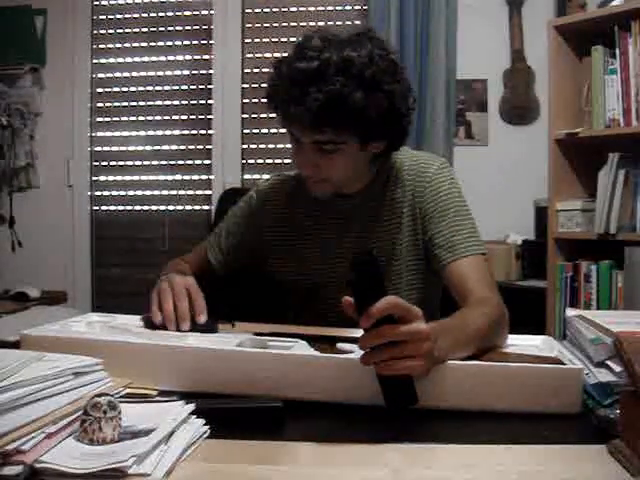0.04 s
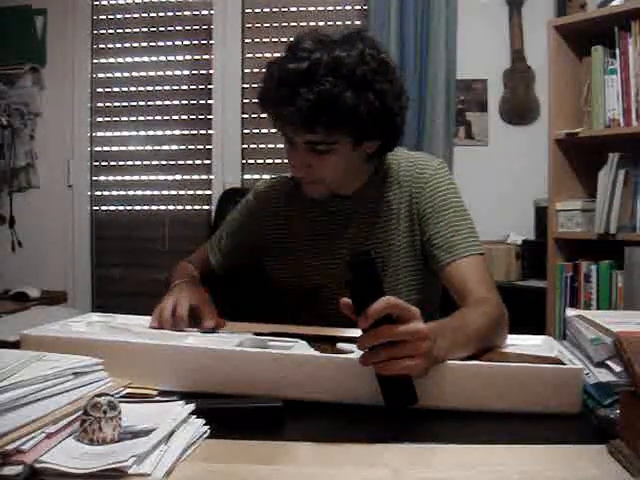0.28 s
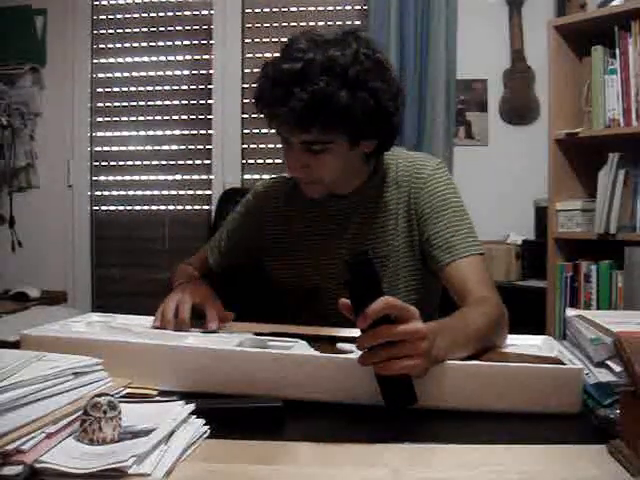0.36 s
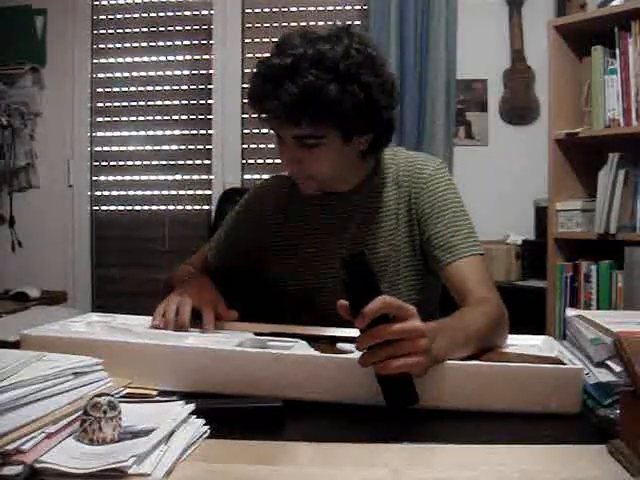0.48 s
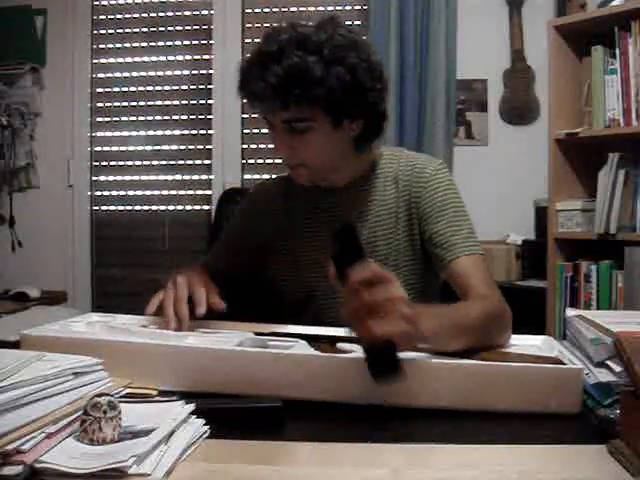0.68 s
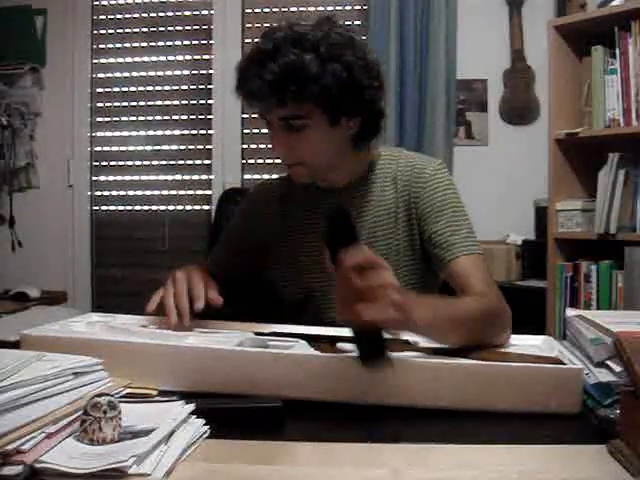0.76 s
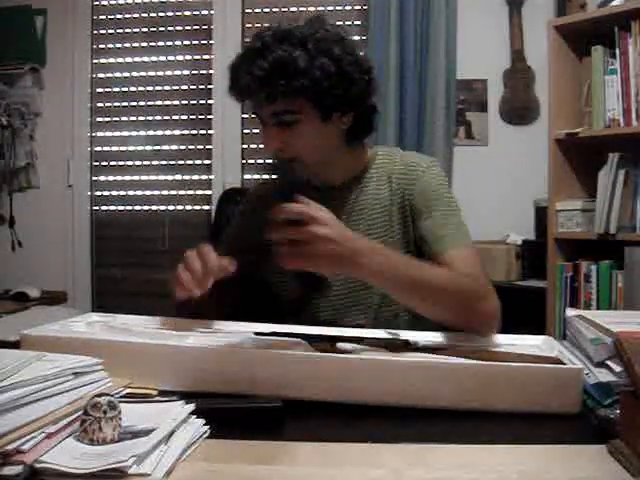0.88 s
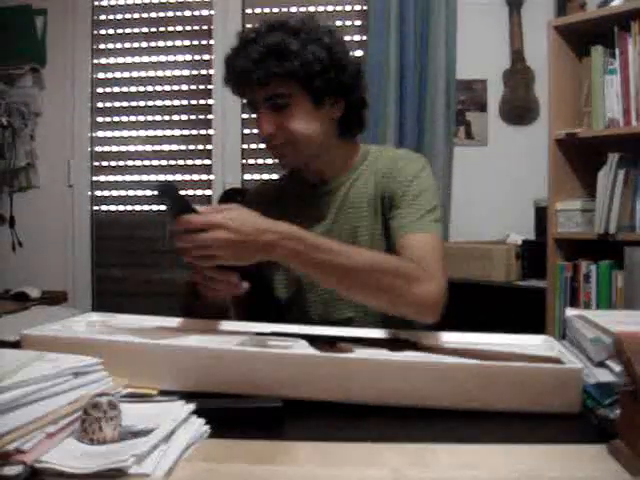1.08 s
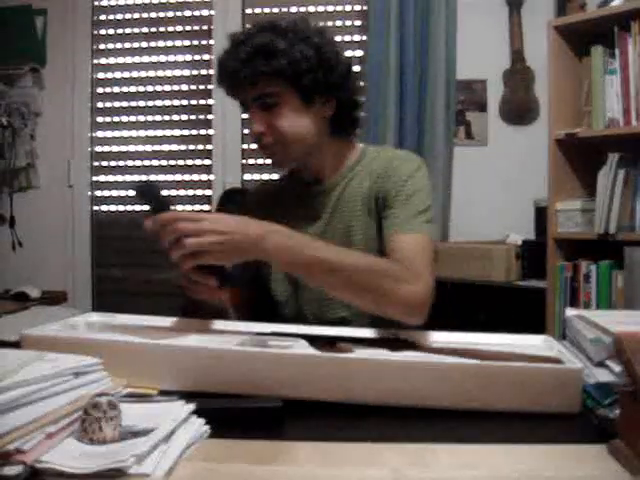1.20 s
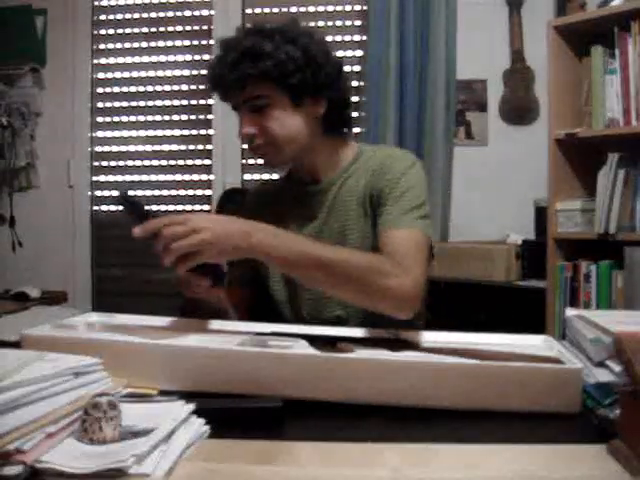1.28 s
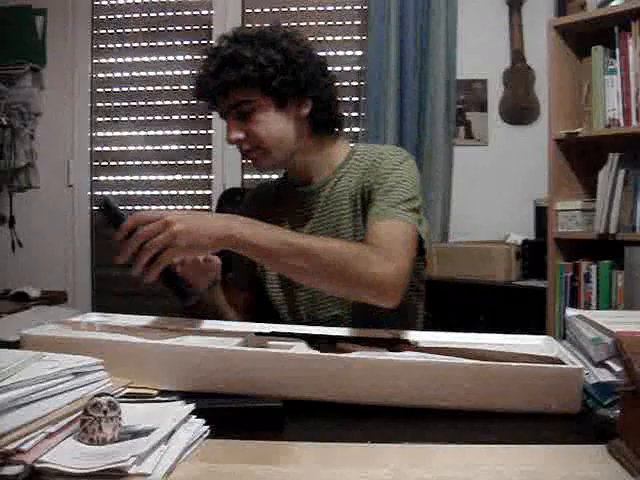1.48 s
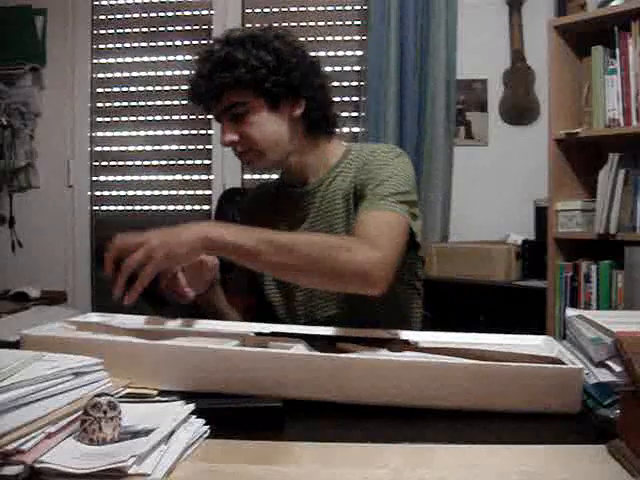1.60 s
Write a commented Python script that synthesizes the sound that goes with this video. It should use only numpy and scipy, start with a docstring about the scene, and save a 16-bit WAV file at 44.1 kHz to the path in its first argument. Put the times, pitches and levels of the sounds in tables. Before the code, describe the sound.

Two hollow knocks of plastic in a cardboard box, amid scraping and small handling clicks.

```python
"""A hard plastic part knocks twice on a cardboard box, scraping as it is let down into it.
Each blow thumps the desk, rings the box, rattles the parts and leans on a small microphone's limiter.
Fingers brush and tick over the parts, then a plastic magazine is picked up with a dry click.
The scrapes are showers of tiny slips; behind it all sit the air of a small room and a brief low hum."""
import sys
import numpy as np
from scipy import signal
from scipy.fft import rfft, irfft, next_fast_len
from scipy.io import wavfile
from scipy.ndimage import uniform_filter1d, minimum_filter1d

SR = 44100
rng = np.random.default_rng(int(sys.argv[2]) if len(sys.argv) > 2 else 0)


def wav_record(signal):
    """Record a signal, one row per channel, as 16-bit PCM in the file named by sys.argv[1]."""
    frames = np.transpose(np.atleast_2d(signal))
    bounded = np.clip(frames, -1, 1)
    # unit amplitude maps onto the largest positive 16-bit level
    quanta = np.round(bounded * 32767).astype(np.int16)
    wavfile.write(sys.argv[1], SR, quanta)


N = 72765
T = np.arange(N) / SR
SIZE = 2 * next_fast_len(N)
HZ = np.fft.rfftfreq(SIZE, 1 / SR)

# The small room's tail. Each row: frequency in Hz, seconds to fall 60 dB.
ROOM_DECAY = [(50, 0.1), (250, 0.27), (700, 0.3), (1400, 0.24), (2200, 0.27), (3500, 0.26), (7000, 0.25),
              (15000, 0.17)]
# Colour of the room tone. Each row: frequency in Hz, relative level in dB.
AIR_COLOUR = [(25, -46), (60, -10), (110, -8.5), (250, -2.5), (400, -0.5), (500, -1), (660, 0.5),
              (760, -5.5), (950, -5.5), (1800, -13), (4000, -15), (7800, -20), (9500, -24.5),
              (10500, -33.5), (15800, -32)]
# Swell of the low hum. Each row: time in seconds, level in dB.
HUM_FADER = [(0.8, -97), (1.0, -61), (1.14, -61.5), (1.27, -57.5), (1.4, -61), (1.52, -75)]
# Swell of the plastic's squeak. Each row: time in seconds, level in dB.
SQUEAK_FADER = [(0.17, -68), (0.187, -32), (0.2, -36), (0.235, -39), (0.26, -80)]
# Plastic and fingers sliding on cardboard. Each row: start, rise, hold and release in seconds,
# level in dB, resonance in Hz, resonance level in dB.
STROKES = [(-0.02, 0.0086, 0.0096, 0.065, -38, 710, -76), (0.045, 0.046, 0.044, .05, -47.5, 836, -54),
           (0.138, 0.068, 0.0087, 0.053, -28, 1240, -37.5), (0.345, 0.023, 0.014, 0.055, -31.5, 1960, -70),
           (0.446, 0.049, 0.022, .02, -44, 1273, -49), (0.677, 0.024, 0.047, .04, -43.5, 1400, -68),
           (0.743, 0.022, .015, 0.017, -38.5, 3250, -43.5), (0.798, 0.021, 0.0099, 0.028, -54, 1870, -46),
           (0.885, 0.014, 0.0093, 0.027, -37, 580, -51), (1.016, .005, 0.0065, 0.023, -51, 2920, -55),
           (1.132, 0.0074, .012, 0.018, -64, 2150, -54)]
# Colour of the rubbed surface. Each row: frequency in Hz, relative level in dB.
SCRAPE_COLOUR = [(100, 2), (300, 4.5), (700, 5.5), (1200, 6.5), (1900, 9), (2600, 3), (3500, 1.5),
                 (5000, -1), (7500, -5), (10500, -16), (15500, -14)]
# Light plastic taps, and one low bump of the box as a hand leaves it.
# Each row: start in seconds, level in dB, ring pitch in Hz, ring level in dB.
TAPS = [(0.001, -47, 750, -79), (0.132, -52, 694, -48.5), (0.2023, -34, 626, -33), (0.5113, -63, 1170, -36),
        (0.5203, -70, 1230, -33.5), (0.53, -34, 1450, -32), (0.698, -37.5, 1400, -42),
        (0.72, -42, 1610, -46), (0.75, -56, 1560, -41), (0.7654, -37, 790, -34), (0.8591, -25.5, 1337, -33),
        (0.871, -34, 260, -37.5), (0.894, -46, 920, -46)]
# Colour of tapped plastic. Each row: frequency in Hz, relative level in dB.
CLICK_COLOUR = [(40, -16), (90, -30), (170, -16), (245, 9.5), (340, -3), (480, 8), (900, 8.5), (1350, 1.5),
                (1850, -5.5), (2350, -2.5), (3000, -5), (5500, -9.5), (9000, -18.5), (11000, -23),
                (15500, -22)]
# Two knocks on the box, each with an early reflection 9 ms later, and one small bounce.
# Each row: start in seconds, then box, thump, rattle and panel levels in dB.
KNOCK_ARRIVALS = [(0.2387, -3.5, -21.5, -26, -2.5), (0.2482, -9.5, -25.5, -21, -11.5),
                  (0.2680, -17, -28.5, -35.5, -17), (0.5341, -11.5, -42.5, -20, -14),
                  (0.5428, -21, -37, -26.5, -17)]
# Colour of the struck box. Each row: frequency in Hz, relative level in dB.
BOX_COLOUR = [(30, -52), (70, -53), (120, -14.5), (190, -26), (250, 1), (340, -8.5), (480, 2), (680, 0.5),
              (850, -0.5), (1050, -7), (1400, -18.5), (2100, -17.5), (3200, -24.5), (4500, -23.5),
              (7000, -31.5), (10000, -42), (12200, -64), (15500, -38)]
# Low end from the desk. Each row: frequency in Hz, relative level in dB.
THUMP_COLOUR = [(12, -4), (34, -8), (55, -38), (80, -7.5), (108, -7), (150, -1.5), (300, -7), (900, -93)]
# Bite of the shaken plastic. Each row: frequency in Hz, relative level in dB.
RATTLE_COLOUR = [(200, -61), (500, -22), (1200, 5.5), (1600, -2), (1980, 8), (2400, -0.5), (2850, 3),
                 (3200, 3.5), (3500, 5), (3900, -5.5), (5500, -33), (9000, -15), (12000, -40.5),
                 (15000, -14)]
# Thin ring of metal parts. Each row: pitch in Hz, width in Hz, relative level in dB.
METAL_RINGS = [(11350, 380, 0), (12850, 380, 0)]
# Ring of the box and its contents. Each row: pitch in Hz, relative level in dB, seconds to fall 60 dB.
BOX_MODES = [(243, -9, .27), (263, -6, .3), (434, -2, .34), (502, -1, .3), (549, -3, .3), (584, -1, .3),
             (661, -2, .33), (700, 0, .31), (730, -2, .34), (805, -1, .32), (834, 0, .32), (1057, -6, .33),
             (1993, -18, .42), (2550, -16, .35)]
# Ring of the hard plastic shell. Each row: pitch in Hz, relative level in dB, seconds to fall 60 dB.
SHELL_MODES = [(1992, -5, .33), (2083, -5, .3), (2783, -6, .24), (3068, -3, .2), (3171, -1, .26),
               (3250, -1, .33), (3350, -3, .33), (3456, -3, .3)]

HIT_GAIN = np.sqrt(.02 * SR)  # gives a hit of energy 1 an rms of 1 over 20 ms


def amp(db):
    """Decibels to gain."""
    return 10 ** (np.asarray(db) / 20)


def unit(x):
    """Scale to rms 1."""
    return x / np.sqrt(np.mean(x ** 2) + 1e-20)


def along(points, hz):
    """Read (Hz, value) points on a log axis."""
    f, v = np.transpose(points)
    return np.interp(np.log(hz + 1), np.log(f + 1), v)


def through(x, response):
    """Pass x through an impulse response."""
    return signal.fftconvolve(x, response)[:N]


def add(out, s, x):
    """Mix x into out from s seconds on."""
    i = max(round(s * SR), 0)
    out[i:] += x[:N - i]


def body(colour):
    """A body's answer to one tap: a minimum-phase impulse response of this colour, energy 1."""
    cepstrum = irfft(along(colour, HZ) * np.log(10) / 20)
    cepstrum[1:SIZE // 2] *= 2
    cepstrum[SIZE // 2 + 1:] = 0
    response = irfft(np.exp(rfft(cepstrum)))[:N]
    return response / np.linalg.norm(response)


def resonance(hz, width_hz):
    """One damped resonance of energy 1."""
    ring = np.diff(np.sin(2 * np.pi * hz * T) * np.exp(-np.pi * width_hz * T), prepend=0)
    ring = signal.lfilter(*signal.butter(1, min(2 * hz, .45 * SR), fs=SR), ring)
    return ring / np.linalg.norm(ring)


def contact_in_room(wet_db, wall_delay_s=.001, build_s=.002, crunch_s=.0032, crossover_hz=1350):
    """One pulse in the lows, a brief crunch on top and a fresh diffuse tail, energy 1 in all."""
    hz, t, bands = signal.stft(rng.standard_normal(N), SR, nperseg=256)
    bands = bands * amp(-60 * t / along(ROOM_DECAY, hz)[:, None])
    tail = signal.istft(bands, SR, nperseg=256)[1][:N]
    tail *= np.clip((T - wall_delay_s) / build_s, 0, 1)
    crunch = rng.standard_normal(N) * np.exp(-T / crunch_s)
    low, high = (signal.butter(2, crossover_hz, kind, fs=SR) for kind in ("low", "high"))
    direct = signal.lfilter(*low, 1. * (T == 0)) + signal.lfilter(*high, crunch / np.linalg.norm(crunch))
    spectrum = rfft(tail, SIZE)
    tail_colour = np.sqrt(np.abs(uniform_filter1d(np.abs(spectrum) ** 2, size=500)) + 1e-12)
    flat_tail = irfft(spectrum / tail_colour)[:N]
    response = direct + amp(wet_db) * flat_tail
    return response / np.linalg.norm(response)


def room_tone(air_db=-48.5, whine_hz=7770, whine_db=-71, hum_hz=71.5):
    """The bed: steady air with a faint whine, and a low hum that swells and fades."""
    air = unit(irfft(rfft(rng.standard_normal(SIZE)) * amp(along(AIR_COLOUR, HZ)))[:N])
    whine = unit(through(rng.standard_normal(N), resonance(whine_hz, width_hz=200)))
    hum = unit(np.sin(2 * np.pi * hum_hz * T)) * amp(np.interp(T, *np.transpose(HUM_FADER)))
    return amp(air_db) * air + amp(whine_db) * whine + hum


def squeak():
    """The plastic squeaks faintly as it starts to slide: noise through one narrow resonance."""
    tone = unit(through(rng.standard_normal(N), resonance(hz=1854, width_hz=43)))
    return tone * amp(np.interp(T, *np.transpose(SQUEAK_FADER), left=-120, right=-120))


def scrapes(slips_per_s=5000, spread_db=3):
    """Tiny slips of uneven size under each stroke excite the surface and one resonance of the part."""
    out, surface = np.zeros(N), body(SCRAPE_COLOUR)
    slips = (rng.random(N) < slips_per_s / SR) * rng.choice([-1, 1], N)
    slips = unit(slips * amp(spread_db * rng.standard_normal(N)))
    for s, rise, hold, release, db, hz, ring_db in STROKES:
        effort = np.interp(T, s + np.cumsum([0, rise, hold, release]), [0, 1, 1, 0]) ** 2
        out += through(slips * effort, amp(db) * surface + amp(ring_db) * resonance(hz, width_hz=600))
    return through(out, contact_in_room(wet_db=-2.5))


def taps():
    """Light plastic taps and a hand's low bump on the box; each rings at the pitch of the spot touched."""
    out, plastic = np.zeros(N), body(CLICK_COLOUR)
    for s, db, hz, ring_db in TAPS:
        tap = amp(db) * plastic + amp(ring_db) * resonance(hz, width_hz=190)
        add(out, s, through(tap, contact_in_room(wet_db=-.5)))
    return HIT_GAIN * out


def ringing(modes, attack_s=.0034):
    """Damped modes that bloom just after a blow and ring out."""
    ring = sum(amp(db - 60 * T / t60) * np.sin(2 * np.pi * hz * T) for hz, db, t60 in modes)
    return ring * (1 - np.exp(-T / attack_s))


def knocks(box_ring_db=-11.5, shell_ring_db=-13, metal_db=-29, metal_t60_s=.36):
    """Each knock, reflection or bounce carries desk thump, box ring and shaken plastic and metal."""
    out = np.zeros(N)
    box, thump, rattle = body(BOX_COLOUR), body(THUMP_COLOUR), body(RATTLE_COLOUR)
    panel = resonance(hz=630, width_hz=140)  # the struck cardboard wall
    metal = sum(amp(db) * resonance(hz, width) for hz, width, db in METAL_RINGS)
    box_ring, shell_ring = ringing(BOX_MODES), ringing(SHELL_MODES)
    for s, box_db, thump_db, rattle_db, panel_db in KNOCK_ARRIVALS:
        shiver = rng.standard_normal(N) * amp(-60 * T / metal_t60_s)
        burst = (amp(box_db) * through(box, contact_in_room(wet_db=10))
                 + amp(panel_db) * panel
                 + amp(thump_db) * through(thump, contact_in_room(wet_db=-12.5))
                 + amp(rattle_db) * through(rattle, contact_in_room(wet_db=7))
                 + amp(box_db + metal_db) * through(metal, shiver / np.linalg.norm(shiver)))
        ring = amp(box_db + box_ring_db) * box_ring + amp(rattle_db + shell_ring_db) * shell_ring
        add(out, s, HIT_GAIN * burst + ring)
    return out


def scene():
    """The mono mix at the microphone: knocks up front, handling around them, room tone beneath."""
    return (knocks() + taps() + scrapes() + squeak() + room_tone())[None]


def record(dry):
    """A fast limiter holds down the loudest peaks, then the very top end is cut off."""
    ceiling, hold_s, top_hz = 1, .002, 15900
    hold = round(hold_s * SR)
    needed = np.minimum(1, ceiling / (np.abs(dry) + 1e-9))
    gain = uniform_filter1d(minimum_filter1d(needed, size=hold), size=hold)
    return irfft(rfft(dry * gain, SIZE) * (HZ < top_hz), SIZE)[:, :N]


dry = scene()
out = record(dry)
wav_record(out)
```